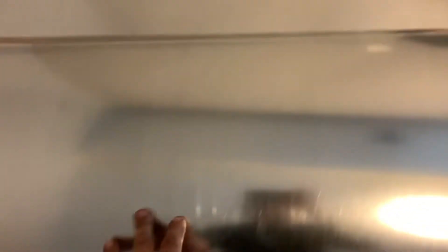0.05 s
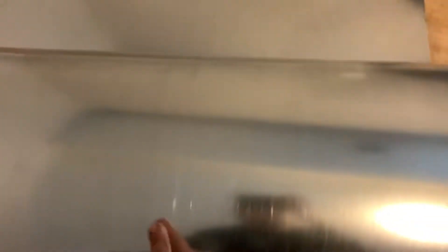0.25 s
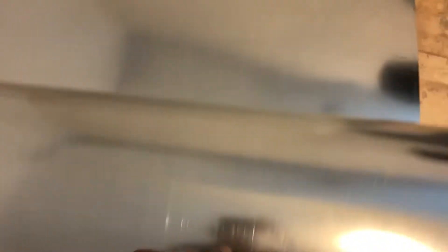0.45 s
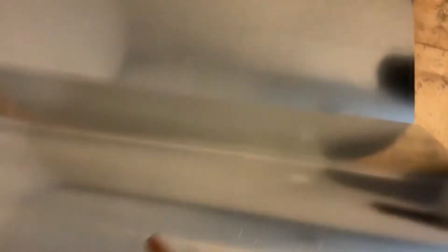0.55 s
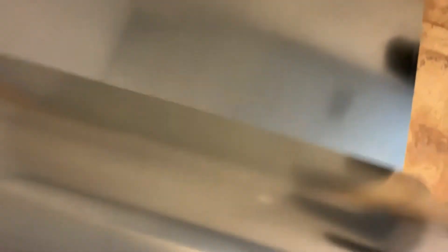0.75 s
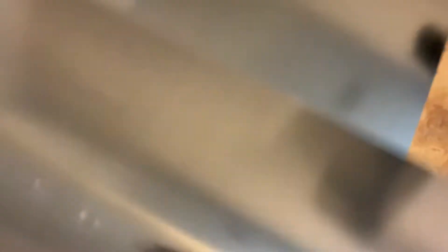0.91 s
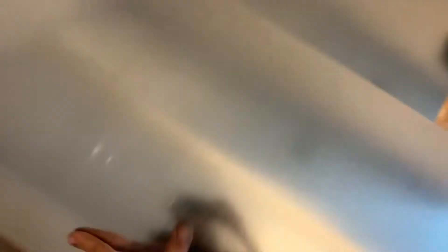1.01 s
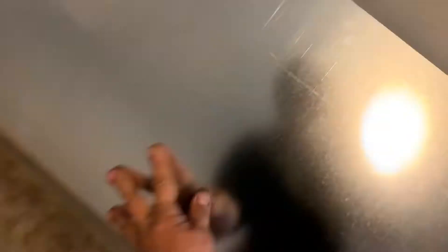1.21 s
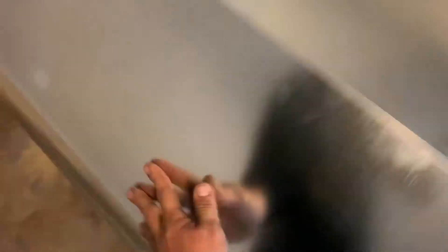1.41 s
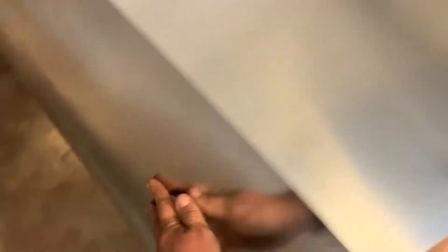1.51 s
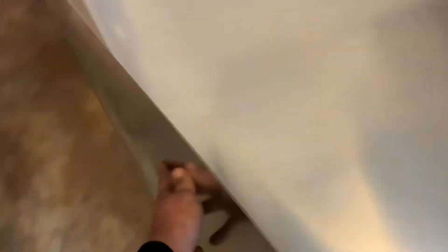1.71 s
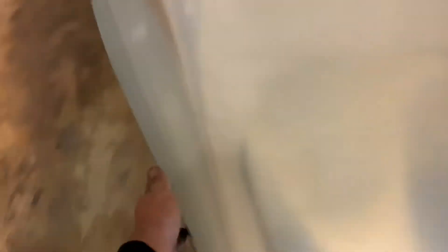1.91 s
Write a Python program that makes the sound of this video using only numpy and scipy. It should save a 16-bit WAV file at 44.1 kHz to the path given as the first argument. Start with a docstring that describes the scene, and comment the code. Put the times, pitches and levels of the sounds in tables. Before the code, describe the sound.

A large thin metal sheet rumbles and wobbles as it is flexed by hand indoors. Short edge scrapes and buckling pops come as it builds to a crash around 0.6 to 0.7 seconds. The ringing slides in pitch and gradually fades, with pops near 1.0 and 1.4 seconds and another scrape at 1.5. A thin, high squeal ends it at about 1.9 seconds.

```python
"""In a workshop, a large thin metal sheet is swung over and flexed by hand.
The sheet has many close-packed ways of vibrating, called modes. Shaking stirs them into a rumble
that climbs to a crash, and they slide in pitch as the bend changes. The sheet flaps and pops.
Its edge scrapes several times, hissing through the metal, and ends on a thin squeal."""
import sys
import numpy as np
from scipy import signal
from scipy.fft import rfft, irfft
from scipy.io import wavfile
from scipy.ndimage import uniform_filter1d, minimum_filter1d, map_coordinates

SR = 44100
rng = np.random.default_rng(int(sys.argv[2]) if len(sys.argv) > 2 else 0)


def generate_wav(signal):
    """Clip the signal to [-1, 1] and save it as 16-bit WAV at the path in sys.argv[1]."""
    frames = np.transpose(np.atleast_2d(signal))
    scaled = np.clip(frames, -1, 1) * 32767
    pcm = np.round(scaled).astype(np.int16)
    wavfile.write(sys.argv[1], SR, pcm)


N = 85995


def amp(db):
    """Turns decibels into a number to multiply by."""
    return 10 ** (np.asarray(db) / 20)


def unit(x):
    """Scales a signal to an average power of one."""
    return x / np.sqrt(np.mean(x ** 2) + 1e-20)


def clock():
    """The time of each sample, in seconds."""
    return np.arange(N) / SR


def pitches():
    """Every frequency in the spectrum, in Hz."""
    return np.fft.rfftfreq(N, 1 / SR)


def by_pitch(points):
    """Joins a table's points into a curve over all pitches."""
    hz, value = np.transpose(points)
    return np.interp(np.log(pitches() + 1), np.log(hz), value)


def shape_tone(x, gain):
    """Multiplies each frequency by its own gain."""
    return irfft(rfft(x) * gain, N)


def die_away(t, fade_s):
    """Stays at one until t = 0, then falls 60 dB every fade_s."""
    return np.exp(-np.log(1000) * np.maximum(t, 0) / fade_s)


def steady(x, window_s=0.086):
    """Evens out slow changes in level and keeps the quick flutter."""
    power = uniform_filter1d((np.atleast_2d(x) ** 2).mean(0), int(window_s * SR))
    return x / np.sqrt(abs(uniform_filter1d(power, size=600)) + 1e-20)


def wander(fastest_hz):
    """A smooth random wobble made of eight sine waves."""
    rates = fastest_hz * np.geomspace(1 / 4, 1, 8)[:, None]
    return unit(np.sin(2 * np.pi * (rates * clock() + rng.random((8, 1)))).sum(0))


def clicks(per_s, spread_db):
    """Clicks of random timing, sign and size."""
    size = amp(spread_db * np.minimum(rng.exponential(1, N), 4))
    return size * rng.choice([-1, 1], N) * (rng.random(N) < per_s / SR)


def pitched_noise(hz, width_hz):
    """A narrow band of noise that follows a pitch."""
    lowpass = 1 / (1 + (2 * pitches() / width_hz) ** 4) ** .5
    slow = shape_tone(rng.standard_normal((2, N)), lowpass)
    phase = 2 * np.pi * np.cumsum(hz * np.ones(N)) / SR
    return unit(slow[0] * np.cos(phase) + slow[1] * np.sin(phase))


def ringing_sheet(knocks_per_s=260, spread_db=4, gap_hz=12, uneven_db=1):
    """Tiny knocks ring modes about gap_hz apart; bending retunes each family of modes its own way."""
    families, bend_depth, bend_hz = 8, 0.016, 13
    out, size = np.zeros((2, N)), len(pitches())
    for family in range(families):
        jitter, left, right = rng.random((3, size))
        strength = amp(uneven_db * np.clip(rng.standard_normal(size), -2, 2))
        mode_hz = (families * np.arange(size) + family + jitter) * gap_hz
        slot = (mode_hz * N / SR).astype(int)
        phases = np.exp(2j * np.pi * np.array([left, right]))
        modes = np.zeros((2, size), complex)
        modes[:, slot[slot < size]] = (strength * phases)[:, slot < size]
        one_ring = irfft(modes, N) * die_away(clock(), fade_s=0.42)
        ringing = shape_tone(clicks(knocks_per_s / families, spread_db), rfft(one_ring))
        # Running through the ringing faster or slower bends its pitch.
        position = np.cumsum(1 + bend_depth * wander(bend_hz))
        out += [map_coordinates(side, [position], order=3, mode="grid-wrap") for side in ringing]
    return unit(out)


# How alike left and right sound: pitch_hz, likeness (1 = the same)
SIDE_LIKENESS = [(60, 1), (140, 0.93), (290, 0.95), (600, 0.05), (1400, 0.7), (2000, 0.25), (2600, .5),
                 (3400, 0.3), (5200, 1), (7000, 0.93), (12000, 1)]
# How far the left wave runs ahead of the right: pitch_hz, lead_radians
LEFT_LEAD = [(150, 0), (690, .5), (1210, 1.3), (2500, 2.7), (4500, 3.2), (5500, 3.1), (7400, 1.1),
             (8600, 0), (10000, -.9), (11300, -2.7), (13300, -3.5), (15200, -6)]
# How much louder the left is than the right: pitch_hz, level_db
LEFT_BALANCE = [(50, -3), (150, 1.5), (500, 2), (1500, 0.4), (8000, -1.5)]

def stereo(pair):
    """Blends two signals into left and right: alike in the bass, out of step in the treble."""
    right, other = rfft(pair)
    likeness = by_pitch(SIDE_LIKENESS)
    left = likeness * right + np.sqrt(1 - likeness ** 2) * other
    left *= np.exp(1j * by_pitch(LEFT_LEAD))
    lean = amp(by_pitch(LEFT_BALANCE) / 2)
    return irfft(np.array([left * lean, right / lean]), N)


# The sheet's tone, from bass to treble: pitch_hz, level_db
SHEET_TONE = [(30, -61), (85, -14), (125, -5.5), (170, -1), (320, 0.5), (380, 1.5), (600, 3.5), (950, 2.5),
              (1400, -4), (1900, -6.5), (2350, -14.5), (3200, -19), (4500, -26.5), (6500, -38.5),
              (10000, -44.5), (16000, -55)]
# How hard the sheet shakes, before each range's trim: time_s, low_db, middle_db, high_db
SHAKING = [(0.0, -41, -36.5, -36.5), (0.12, -27, -31, -34.5), (0.225, -22, -29.5, -35),
           (0.27, -24.5, -26.5, -29.5), (0.335, -23, -29.5, -33), (0.355, -18.5, -20.5, -24),
           (0.396, -19.5, -21, -27), (0.46, -25.5, -26.5, -23.5), (0.54, -22, -23.5, -27),
           (0.57, -14.5, -21, -21.5), (0.608, -23, -17, -24.5), (0.64, -15, -23, -23.5),
           (0.668, -17, -18, -26.5), (0.7, -21, -14, -21.5), (0.745, -21.5, -18, -21.5),
           (0.808, -27, -19.5, -25), (0.92, -21, -22.5, -24.5), (1.02, -23.5, -21, -25),
           (1.11, -27.5, -20, -23.5), (1.232, -27.5, -23.5, -28), (1.314, -28, -25.5, -33),
           (1.368, -26.5, -25, -31), (1.52, -36, -30.5, -36), (1.59, -33, -28.5, -38.5),
           (1.7, -37, -31.5, -36.5), (1.754, -34.5, -34, -38.5), (1.9, -46, -42, -50.5),
           (1.95, -46, -41, -52)]

def rumble():
    """The sheet shakes: its low, middle and high modes each swell with the flexing."""
    edges_hz, trims_db = (392, 1133), (-1.45, 1, 1.5)
    time_s, *levels_db = np.transpose(SHAKING)
    sheet = stereo(shape_tone(ringing_sheet(), amp(by_pitch(SHEET_TONE))))
    low, below_high = (1 / (1 + (pitches() / hz) ** 10) for hz in edges_hz)
    bands = low, below_high - low, 1 - below_high
    out = np.zeros((2, N))
    for band, level_db, trim_db in zip(bands, levels_db, trims_db):
        swell = amp(np.interp(clock(), time_s, level_db) + trim_db)
        out += swell * steady(shape_tone(sheet, band))
    return out


# Notes that stand out as the sheet bends: start_s, length_s, first_hz, last_hz, width_hz, level_db
SUNG_NOTES = [(-.06, 0.49, 109.5, 123, 9.2, -32.5), (0.248, 0.2, 105.2, 142.6, 28, -26),
              (0.319, 0.23, 326.7, 317.8, 8, -23), (0.568, 0.069, 561, 593, 12, -18),
              (0.576, 0.11, 134.9, 165, 40, -22), (0.66, 0.15, 342, 312.3, 12, -21),
              (0.664, 0.1, 640, 818.5, 300, -16), (0.684, 0.16, 1120, 1183, 186, -17),
              (0.677, 0.21, 1928, 1835, 110, -23), (0.825, 0.11, 751, 653, 20, -22),
              (0.914, 0.28, 190, 166, 21, -28.5), (0.938, 0.1, 715, 779, 11, -25.5),
              (0.971, 0.07, 1677, 1516, 21, -24), (1.011, 0.11, 900, 940, 51, -21),
              (1.033, 0.094, 410, 413, 30, -28), (1.066, 0.06, 700, 743, 47, -22),
              (1.054, 0.14, 1580, 1557, 56, -24.5), (1.319, 0.093, 660.6, 667, 9.1, -25),
              (1.346, 0.066, 749, 802, 24, -22.5), (1.27, 0.25, 819, 769, 150, -25),
              (1.48, 0.18, 9880, 9700, 700, -47.5), (1.544, 0.1, 376.5, 368, 15, -28),
              (1.628, 0.12, 485, 475, 10, -33.5), (1.69, 0.16, 195.5, 198, 7.2, -40)]

def singing():
    """Single modes and clusters of neighbours swell, slide with the bend and sink back."""
    pure_width_hz = 35  # narrower notes are mostly one clean tone
    out = np.zeros((2, N))
    for start_s, length_s, first_hz, last_hz, width_hz, level_db in SUNG_NOTES:
        progress = np.clip((clock() - start_s) / length_s, 0, 1)
        hz = first_hz + (last_hz - first_hz) * progress
        phase = 2 * np.pi * (np.cumsum(hz) / SR + rng.random())
        tone = unit(np.array([np.cos(phase), np.sin(phase)]))
        cluster = steady(np.array([pitched_noise(hz, width_hz) for _ in range(2)]))
        purity = 1 / (1 + (width_hz / pure_width_hz) ** 4)
        note = np.sqrt(purity) * tone + np.sqrt(1 - purity) * cluster
        out += amp(level_db) * np.sin(np.pi * progress) * note
    return stereo(out)


# How strongly the whole sheet flaps: time_s, level_db
FLAPPING = [(0, -35.5), (.12, -38.5), (.22, -45), (.3, -38), (.48, -42), (.61, -34), (.73, -35.5),
            (.8, -50), (1.03, -39.5), (1.15, -49), (1.3, -42), (1.47, -67), (1.95, -60)]

def flap():
    """The sheet's lowest mode pumps the air, the same on both sides."""
    level = amp(np.interp(clock(), *np.transpose(FLAPPING)))
    return level * steady(pitched_noise(hz=58, width_hz=14))


# The tone of a scrape: pitch_hz, level_db
SCRAPE_TONE = [(300, -9), (1200, -4.5), (2200, 4.5), (3300, 2), (4500, 1.5), (6500, -6), (9500, -10),
               (12500, -16), (16000, -23)]
# Scrapes of the edge (more tilt is brighter): start_s, length_s, level_db, tilt_db_per_octave
EDGE_SCRAPES = [(-.02, .02, -44.5, 1), (0.064, 0.037, -39.5, 1), (0.159, 0.12, -44.5, 1.5),
                (0.228, 0.048, -34, 1), (0.338, 0.12, -29.5, 0.5), (0.433, 0.06, -30.5, 4.5),
                (0.542, 0.021, -22, -4), (1.471, 0.082, -32.5, 2), (1.622, .03, -47, -0.5)]

def scrapes():
    """The edge makes a stream of tiny slips, heard directly and through the ringing sheet."""
    slips_per_s, spread_db, direct_gain = 1800, 0.5, 0.2
    rise_s, pivot_hz = 0.023, 4000
    slips = unit(np.array([clicks(slips_per_s, spread_db) for _ in range(2)]))
    ringing = ringing_sheet(slips_per_s, spread_db, gap_hz=22, uneven_db=2.5)
    hiss = stereo(ringing + direct_gain * slips)
    octaves = np.maximum(np.log2((pitches() + 1) / pivot_hz), -2)
    out = np.zeros((2, N))
    for start_s, length_s, level_db, tilt in EDGE_SCRAPES:
        t = clock() - start_s
        stroke = np.clip(t / rise_s, 0, 1) * die_away(t - length_s, fade_s=0.54)
        tone = amp(by_pitch(SCRAPE_TONE) + tilt * octaves)
        out += amp(level_db) * stroke * steady(shape_tone(hiss, tone))
    return out


# The tone of the room's hiss: pitch_hz, level_db
ROOM_TONE = [(40, 0), (300, 17), (1500, 6.5), (4000, 2), (9000, 2), (16000, -10)]

def room_hiss(level_db=-49.5):
    """A faint, even hiss fills the workshop."""
    hiss = shape_tone(rng.standard_normal((2, N)), amp(by_pitch(ROOM_TONE)))
    return amp(level_db) * unit(stereo(hiss))


# Pops as the sheet buckles: start_s, level_db, tilt_db_per_octave
BUCKLE_POPS = [(0.345, -21, 3), (0.375, -15.5, -5), (0.557, -18, -13), (.69, -15.5, 2), (0.964, -19, -4),
               (1.359, -21.5, 0), (1.661, -27.5, -3)]

def buckles():
    """The sheet snaps into a new curve: its low and middle modes jump and die away."""
    rise_s, top_hz = 0.0073, 1070
    sheet = stereo(ringing_sheet())
    ratio = (pitches() + 1) / top_hz
    octaves = np.maximum(np.log2(ratio), -2)
    out = np.zeros((2, N))
    for start_s, level_db, tilt in BUCKLE_POPS:
        t = clock() - start_s
        pop = np.clip(t / rise_s, 0, 1) * die_away(t - rise_s, fade_s=0.13)
        tone = amp(by_pitch(SHEET_TONE) + tilt * octaves) / (1 + ratio ** 6)
        out += amp(level_db) * pop * steady(shape_tone(sheet, tone))
    return out


# The edge's closing squeal: time_s, pitch_hz, level_db
EDGE_SQUEAL = [(1.815, 8500, -66), (1.835, 8500, -47), (1.86, 8650, -48.5), (1.88, 8660, -40),
               (1.91, 9000, -39), (1.95, 9000, -43)]

def squeal(roughness=0.18):
    """The edge sticks and slips, making a thin, chattering whistle that creeps upward."""
    time_s, pitch_hz, level_db = np.transpose(EDGE_SQUEAL)
    chatter = unit(np.exp(roughness * wander(fastest_hz=100)))
    level = amp(np.interp(clock(), time_s, level_db)) * (clock() > time_s[0])
    whistle = pitched_noise(np.interp(clock(), time_s, pitch_hz), width_hz=500)
    return level * chatter * steady(whistle)


def scene():
    """Adds the sheet's body, its edge and the room together."""
    return rumble() + buckles() + singing() + flap() + scrapes() + squeal() + room_hiss()


def record(dry):
    """Smoothly turns down the loudest peaks, then cuts the very highest treble."""
    ceiling, smooth_s, cutoff_hz = 0.9, 0.008, 15800
    window = int(smooth_s * SR)
    allowed_gain = ceiling / np.maximum(abs(dry).max(0), ceiling)
    gain = uniform_filter1d(minimum_filter1d(allowed_gain, window), window)
    lowpass = signal.firwin(511, cutoff_hz, window=("kaiser", 9), fs=SR)
    return signal.oaconvolve(dry * gain, lowpass[None], "same")


dry = scene()
out = record(dry)
generate_wav(out)
```